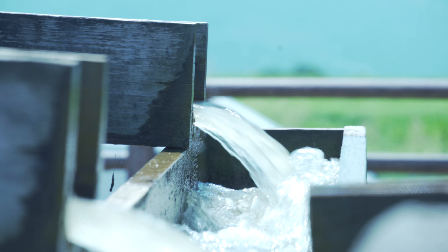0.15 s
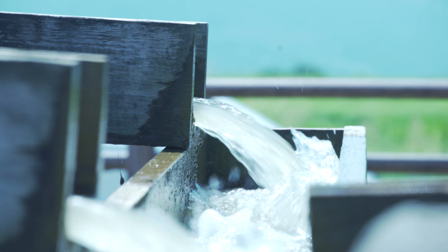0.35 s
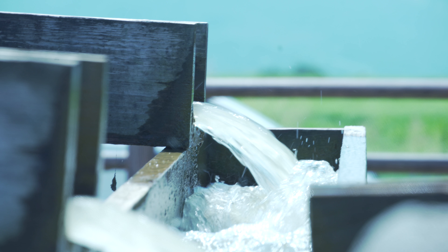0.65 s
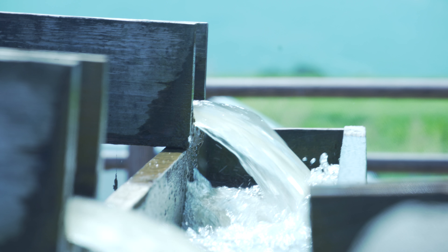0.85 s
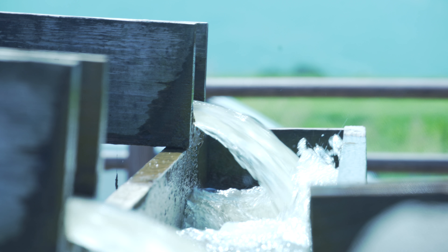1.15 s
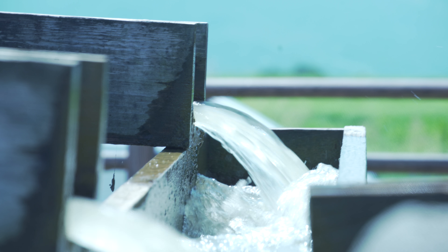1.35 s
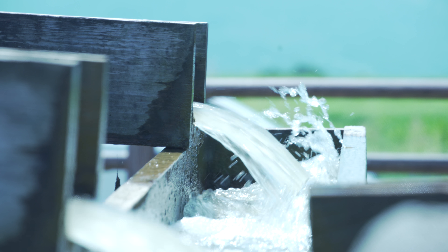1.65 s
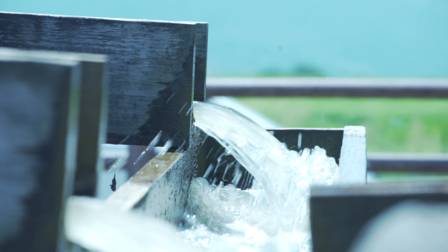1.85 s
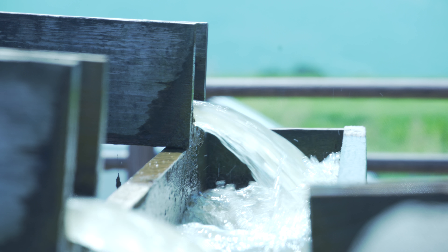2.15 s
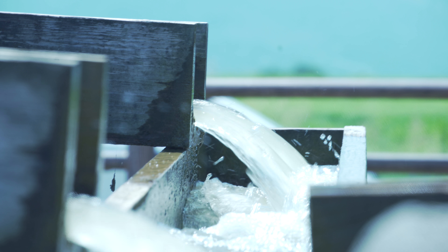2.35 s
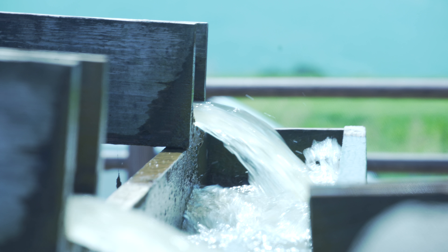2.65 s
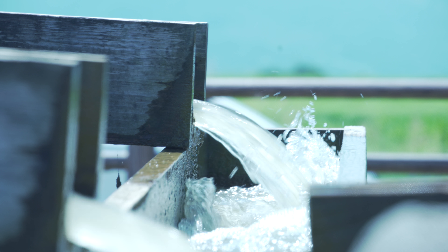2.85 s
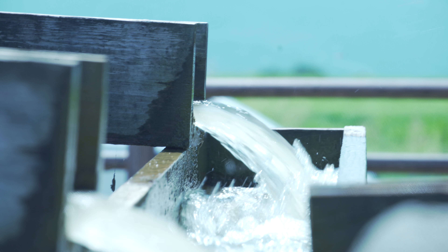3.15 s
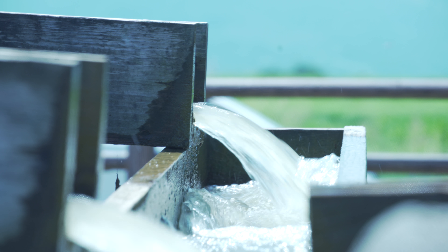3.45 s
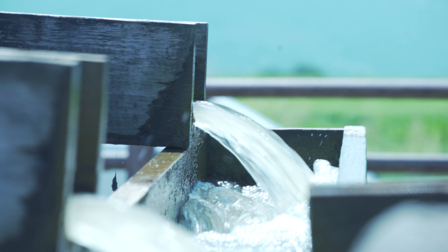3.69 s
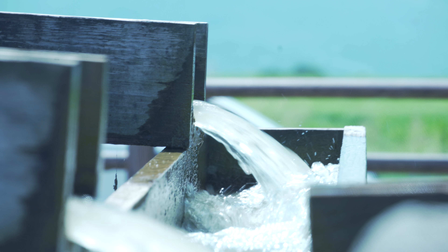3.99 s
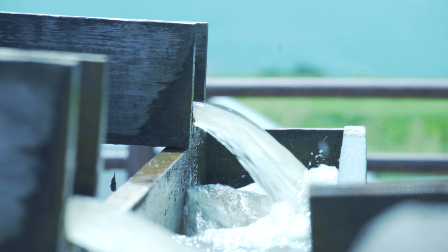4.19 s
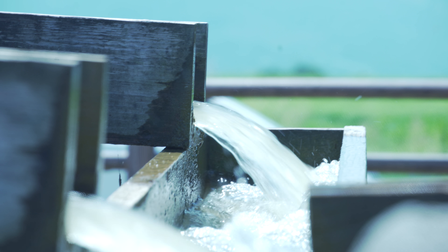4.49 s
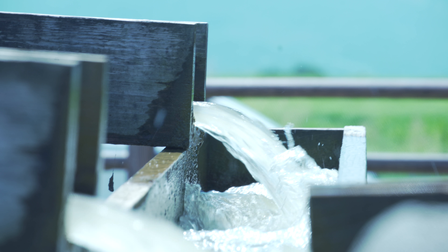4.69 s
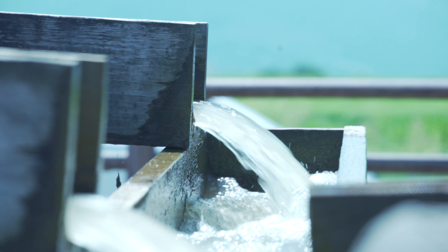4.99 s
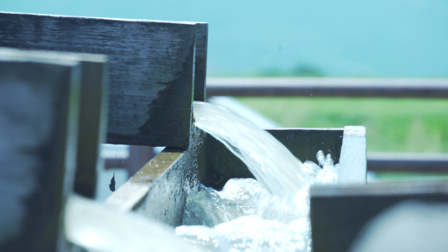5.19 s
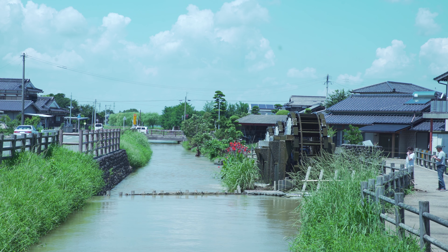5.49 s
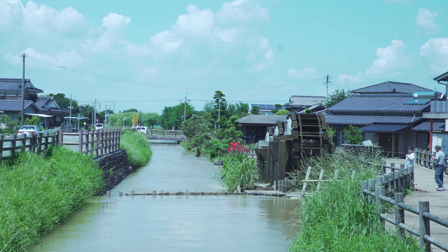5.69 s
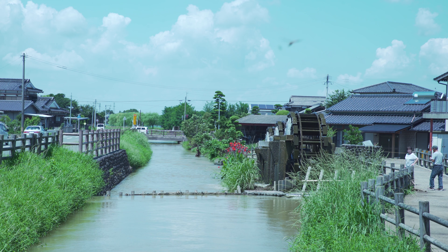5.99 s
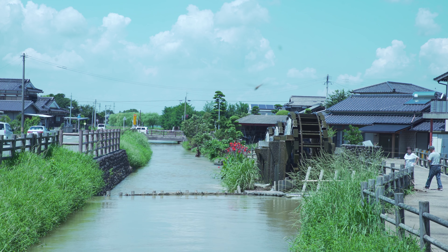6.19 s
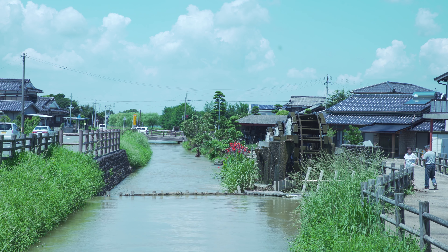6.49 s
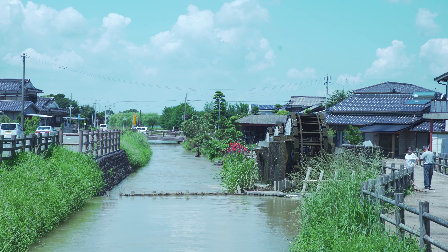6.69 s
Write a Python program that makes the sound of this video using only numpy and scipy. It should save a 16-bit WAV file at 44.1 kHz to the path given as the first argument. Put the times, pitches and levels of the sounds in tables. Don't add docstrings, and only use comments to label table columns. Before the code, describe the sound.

Close foaming water rush with bubbly gurgles and bright spray, then a sudden change to a quieter outdoor wash, tyre roar and faint motor hum.

```python
import sys
import numpy as np
from scipy import signal
from scipy.fft import rfft, irfft, next_fast_len
from scipy.io import wavfile

SR = 44100
rng = np.random.default_rng(int(sys.argv[2]) if len(sys.argv) > 2 else 0)


def to_wav(sig):
    pcm = np.clip(np.atleast_2d(sig), -1, 1) * 32767
    pcm = np.round(pcm).astype(np.int16)
    wavfile.write(sys.argv[1], SR, pcm.T)


def ratio(d):
    e = np.asarray(d, float) / 20
    return 10 ** e


N = 301644

# f/Hz, level/dB (per Hz)
CHURN_TONE = [(18, -78), (30, -63), (47, -42), (140, -23), (165, -25.5), (200, -17.5), (417, -8), (504, -4),
              (700, -3.5), (850, -1.5), (1600, -2.5), (2000, -2.5), (4200, -4), (6300, -13.5)]
# f/Hz, level/dB (per Hz)
SPRAY_TONE = [(3500, -30), (5400, -9.5), (6300, -6), (7050, 0), (7600, -0.5), (8700, 2), (9300, 1),
              (10600, -3), (11700, -3.5), (12300, -4.5), (14500, -5), (15400, -4.5)]
# t/s, flow level/dB, gurgle level/dB
SURGES = [(0.45, 0, -3), (0.6, 1, -1.5), (0.84, -0.9, 2), (1.2, 1.2, 1), (1.38, -0.2, 5.5), (1.56, .3, -3),
          (1.8, 0.6, .4), (2.04, -0.6, 1), (2.64, -0.5, 3), (3.0, 0.5, -1.5), (3.45, 1.2, -2.5),
          (3.72, 0, 1.8), (3.84, -0.2, 0), (4.1, 1, 2), (4.32, 0.4, -1), (4.68, 0.9, -2), (5.04, 1.6, -2),
          (5.28, 0.4, -1), (5.42, 0.3, 2), (2.4, .5, -2.5), (2.95, 0.7, 2), (3.24, 0.5, 0.5)]
# t/s, level/dB
TEARS = [
    (.555, -2.5),
    (.82, 1.5),
    (1.52, 0),
    (2.62, -1.5),
    (3.68, 3),
    (3.93, -1.5),
    (4.1, -2),
    (4.82, -1.5),
    (5.12, -1.5),
]
# t/s, peak level/dB, f/Hz
GLUGS = [(0.06, -25, 990), (0.261, -25, 2580), (0.821, -25, 2540), (0.943, -24, 980), (1.07, -21, 1420),
         (1.148, -24, 1700), (1.316, -20, 2430), (1.397, -25, 2320), (1.665, -20, 2270), (1.734, -22, 1156),
         (1.827, -26, 1190), (1.912, -20, 2340), (1.966, -23, 1160), (2.348, -23, 2050), (2.438, -21, 1090),
         (2.959, -22.5, 1020), (3.084, -22, 1280), (3.167, -28, 1600), (3.218, -22, 1550),
         (3.563, -31, 804), (3.621, -28, 820), (3.683, -23, 1470), (4.114, -25, 1240), (4.387, -24, 2050),
         (4.483, -22, 1630), (4.7, -27, 1710), (5.199, -26, 1350), (5.346, -19, 1550)]
# t/s, lowest band f/Hz, number of bands
WIDE_FLECKS = [(.235, 11020, 1), (.49, 4480, 3), (.815, 5510, 2), (1.326, 8960, 1), (1.628, 4480, 3),
               (1.651, 6890, 2), (1.976, 4130, 3), (2.324, 9650, 1), (2.557, 8960, 1), (4.414, 11020, 1),
               (2.858, 13090, 1), (3.021, 4130, 3), (3.067, 5510, 2), (3.207, 5170, 1), (3.23, 4130, 3),
               (3.3, 13780, 1), (3.416, 14470, 1), (3.601, 11020, 2), (3.718, 13780, 1), (3.81, 6890, 1),
               (4.019, 4130, 2), (4.043, 6890, 2), (4.228, 4130, 1), (4.321, 7580, 2), (4.553, 4820, 2),
               (4.67, 7580, 1), (5.366, 6200, 2), (6.016, 6890, 1), (6.295, 4130, 1), (6.55, 7580, 2)]
# f/Hz, level/dB (per Hz)
ROAR_TONE = [(18, -71), (30, -54), (75, -38), (98, -27), (172, -24), (292, -8.5), (473, -6), (691, -4),
             (872, -0.5), (1250, -2), (1800, -4.5), (2890, -5), (4300, -8.5), (6300, -18)]
# f/Hz, level/dB (per Hz)
HISS_TONE = [(3500, -30), (5400, -8), (6400, -6), (7100, 2.5), (7600, 2), (8400, -0.5), (10200, -1.5),
             (10900, -2), (11600, -3), (12600, -1.5), (13400, -5), (14200, -3), (15500, -5)]
# t/s, roar level/dB, tyre drone level/dB (against roar)
APPROACH = [
    (5.495, -29, -2),
    (5.6, -30, -0.5),
    (5.85, -29.5, -1),
    (6.0, -30, 1),
    (6.15, -28.5, -0.2),
    (6.31, -29.5, 1.5),
    (6.6, -28.5, 0.3),
    (6.75, -27.5, 0),
    (6.84, -27.5, 1),
]
# t/s, level/dB
BOOMS = [
    (5.53, -59),
    (5.67, -60),
    (5.91, -61),
    (6.12, -68),
    (6.38, -66),
    (6.53, -75),
    (6.74, -66),
]

CUT_S = 5.484
TOP_HZ = 15760


def rms_one(x):
    return x / np.sqrt(np.mean(x ** 2) + 1e-20)


def in_time(rows):
    s, *columns = np.transpose(rows)
    return [np.interp(np.arange(N) / SR, s, c) for c in columns]


def bumps(at_s, heights, width_s):
    out = np.zeros(N)
    for s, height in zip(at_s, heights):
        first = max(round((s - 4 * width_s) * SR), 0)
        last = min(round((s + 4 * width_s) * SR), N)
        i = np.arange(first, last)
        out[i] += height * np.exp(-.5 * ((i / SR - s) / width_s) ** 2)
    return out


def drift(rate_hz):
    hop = 40
    r = np.exp(-2 * np.pi * hop * rate_hz / SR)
    noise = rng.standard_normal(N // hop + 2002)
    slow = signal.lfilter([1], [1, -2 * r, r * r], noise)[2000:]
    return np.interp(np.arange(N) / hop, np.arange(len(slow)), rms_one(slow))


def colour(x, spectrum):
    size = next_fast_len(N)
    hz = np.maximum(np.arange(size // 2 + 1) * SR / size, 1)
    table = np.array(spectrum)
    level_db = np.interp(np.log(hz), np.log(table[:, 0]), table[:, 1])
    fall_db = 50 * np.maximum(np.log2(hz / table[-1, 0]) - .04, 0)
    gain = ratio(level_db - fall_db) * (hz < TOP_HZ)
    return rms_one(irfft(rfft(x, size) * gain, size)[:N])


def swell(x, share_db, low_hz, high_hz):
    sos = signal.butter(1, [low_hz, high_hz], "band", fs=SR, output="sos")
    return x + (ratio(share_db) - 1) * signal.sosfilt(sos, x)


def rush(surge_db, patchy_db):
    out = 0
    surge = drift(7) + .7 * drift(25)
    edges = 20 * 2 ** np.arange(0, 10.1, .5)
    white, shared = rng.standard_normal((2, N)), drift(6)
    for k, (low, high) in enumerate(zip(edges, edges[1:])):
        sos = signal.butter(2, [low, high], "band", fs=SR, output="sos")
        band = signal.sosfilt(sos, white[k % 2])
        before, shared = shared, drift(1.45)
        patches = before + shared + 0.72 * drift(22)
        brightness = np.clip(low / 4000, .1, 1.3)
        out = out + band * ratio(surge_db * brightness * surge + patchy_db * patches)
    return rms_one(out)


def bubbles(per_s, cycles, size_db, clump_db):
    pitches_hz = np.geomspace(200, 15000, 36)
    slots = N // 8
    sizes = ratio(size_db * np.minimum(rng.exponential(1, (36, slots)), 4))
    chance, signs = rng.random(sizes.shape), rng.choice([-1, 1], sizes.shape)
    births_at = np.arange(slots) * 8 + rng.integers(0, 8, slots)
    clumps = ratio(clump_db * drift(9))[:slots * 8:8]
    out = np.zeros(N)
    for k, hz in enumerate(pitches_hz):
        clicks = np.full(N, 1e-18)
        born = chance[k] < 8 * per_s * (hz / 1000) * clumps / SR
        clicks[births_at] += sizes[k] * signs[k] * born
        r, w = ratio(-60 * hz / (cycles * SR)), 2 * np.pi * hz / SR
        ringing = signal.lfilter([0, np.sin(w)], [1, -2 * r * np.cos(w), r * r], clicks)
        out += np.sqrt(hz) * rms_one(ringing)
    return rms_one(out)


def jet(wash):
    churn_db, spray_db, surge_s, tear_s = -32, -38, 0.057, .01
    s, flow, gurgle = np.transpose(SURGES)
    flow_db, gurgle_db = bumps(s, flow, surge_s), bumps(s, gurgle, surge_s)
    tear_db = bumps(*np.transpose(TEARS), tear_s)
    foam = wash + ratio(-6.0) * bubbles(per_s=45, cycles=15.8, size_db=2.0, clump_db=2.5)
    churn = swell(colour(foam, CHURN_TONE), 0.66 * gurgle_db, 830, 1330)
    spray_level = ratio(spray_db + 0.64 * flow_db + 0.25 * drift(4.3))
    spray = spray_level * colour(foam, SPRAY_TONE)
    return ratio(tear_db) * (ratio(churn_db + flow_db) * churn + spray)


def glugs(cycles, rise, below_db):
    out, t = np.zeros(N), np.arange(SR // 20) / SR
    for s, peak_db, hz in GLUGS:
        fade = ratio(-60 * t * hz / cycles) * (1 - np.exp(-t * hz * 2))
        ring = np.sin(2 * np.pi * hz * t * (1 + rise * t * hz / cycles))
        out[round(s * SR):][:len(t)] += ratio(peak_db - below_db) * fade * ring
    return out


def fleck_bands():
    bands = []
    for (s, low_hz, count), chance in zip(WIDE_FLECKS, rng.random((len(WIDE_FLECKS), 2, 3))):
        widths_hz = np.interp(chance[0], [0, 1], (1150, 2400))
        gaps_hz = np.interp(chance[1], [0, 1], (3600, 5600))
        lows_hz = low_hz + np.cumsum(gaps_hz) - gaps_hz[0]
        for low, width in zip(lows_hz[:count], widths_hz):
            bands.append((s, low, min(low + width, TOP_HZ)))
    return bands


def wide_flecks(x):
    frame, grid = 2048, 105
    half = frame // 2
    out, n = x.copy(), np.arange(frame) + .5
    window = np.sin(np.pi * n / frame)
    for s, low_hz, high_hz in fleck_bands():
        start = grid + half * round((s * SR - grid) / half - 1)
        lines = np.arange(round(low_hz * frame / SR), round(high_hz * frame / SR)) + .5
        waves = window * np.cos(np.pi / half * np.outer(lines, n + half / 2))
        same, left, right = (waves @ x[0, start + k * frame:][:frame] for k in (0, 1, 2))
        out[:, start:start + frame] += 2 / half * np.array([left - same, right - same]) @ waves
    return out


def canal_bank(wash):
    roar_db, drone_db = in_time(APPROACH)
    t = np.arange(N) / SR
    hiss_rise_db = 2.5 * np.maximum(t - 6.26, 0)
    hiss_dip_db = 2.5 * np.clip(1 - (t - CUT_S) / 0.035, 0, 1)
    hiss_db = -39 + hiss_rise_db - hiss_dip_db
    roar = swell(colour(wash, ROAR_TONE), 1.3 * drone_db, 540, 1400)
    return ratio(roar_db) * roar + ratio(hiss_db) * colour(wash, HISS_TONE)


def motor():
    motor_hz, beat_hz, beat_null_s, boom_s = 64.0, 2.2, 5.825, 0.031
    t = np.arange(N) / SR - beat_null_s
    first = ratio(-71 + 3 * t) * np.sin(np.pi * beat_hz * t)
    s, db = np.transpose(BOOMS)
    second = ratio(-79) + bumps(s, ratio(db), boom_s)
    third = ratio(-68 + 2 * drift(6.0))
    turn = 2 * np.pi * np.cumsum(motor_hz * (1 + 0.0038 * drift(1.6))) / SR
    orders = first * np.sin(turn) + second * np.sin(2 * turn) + third * np.sin(3 * turn)
    return np.sqrt(2) * orders


def scene():
    wash = rush(surge_db=0.01, patchy_db=0.12)
    since = np.arange(N) / SR - CUT_S
    near = np.clip(-since / .008, 0, 1)
    far = (1 - near) * np.interp(since, [0, .035], [.6, 1])
    trough = near * jet(wash) + glugs(cycles=63, rise=0.19, below_db=6.5)
    bank = far * (canal_bank(wash[::-1]) + motor())
    mono = trough + bank
    return np.array([mono, mono])


def low_pass(x):
    return signal.sosfilt(signal.butter(12, 15850, fs=SR, output="sos"), x)


def record(dry):
    mix = wide_flecks(dry)
    return low_pass(mix)


dry = scene()
out = record(dry)
to_wav(out)
```